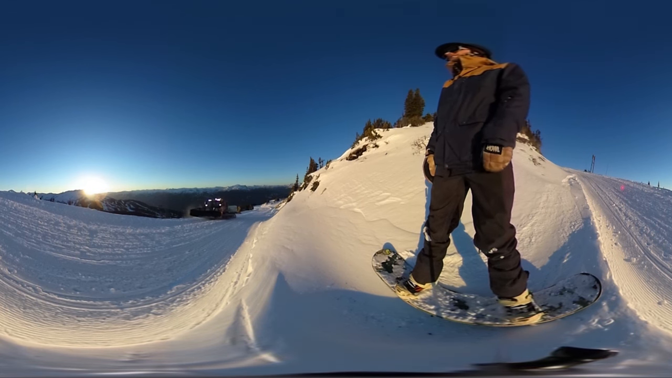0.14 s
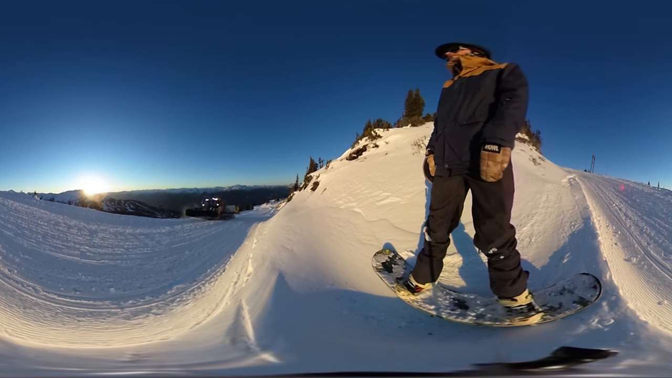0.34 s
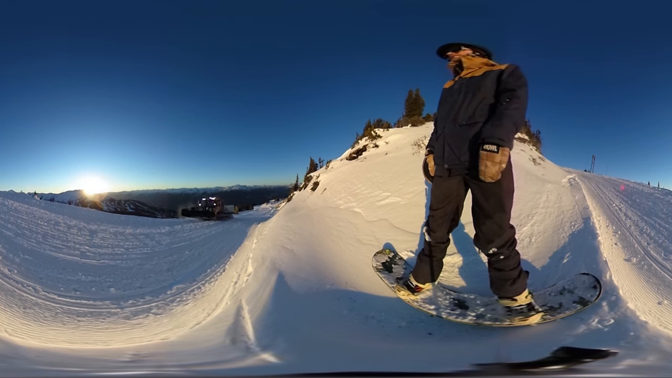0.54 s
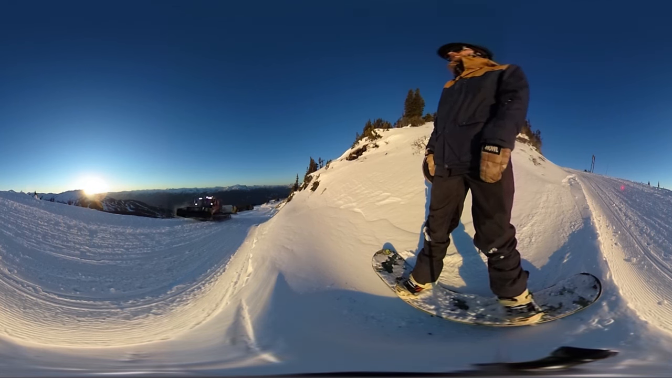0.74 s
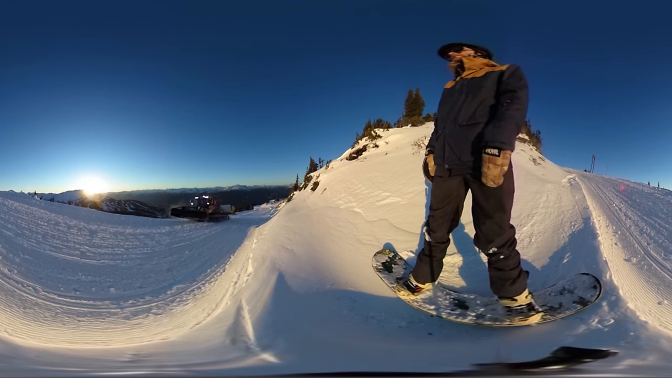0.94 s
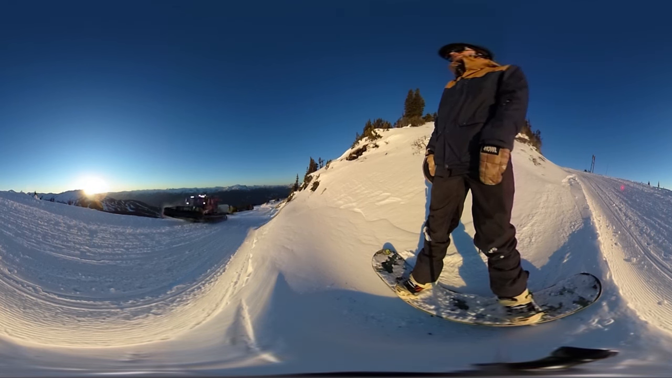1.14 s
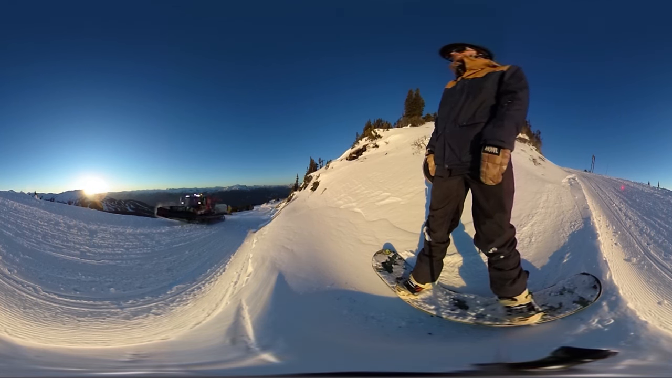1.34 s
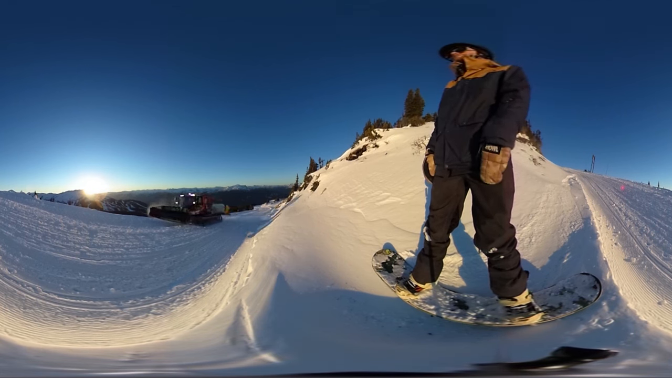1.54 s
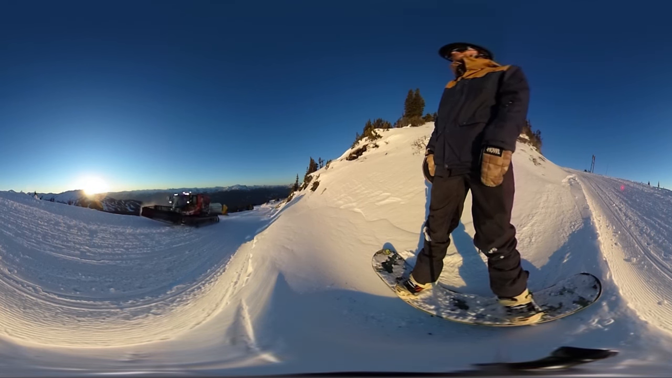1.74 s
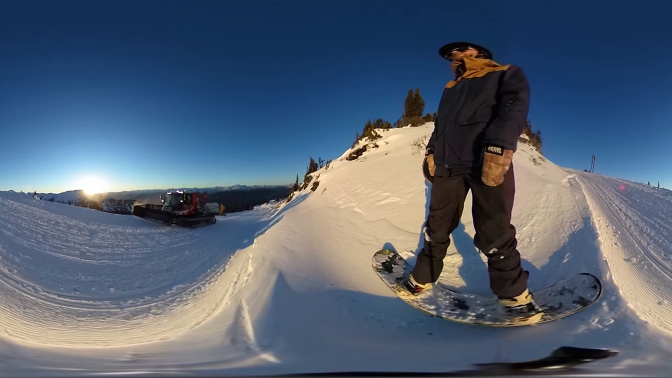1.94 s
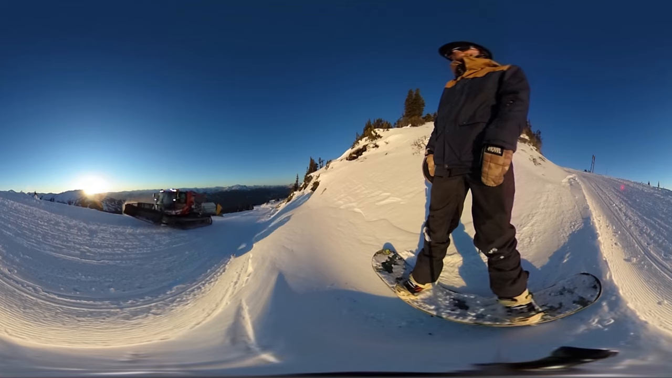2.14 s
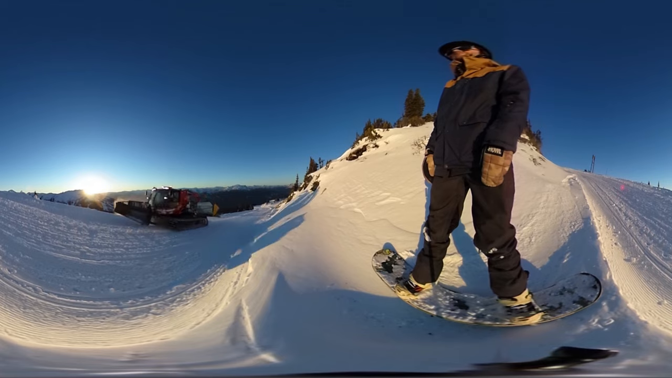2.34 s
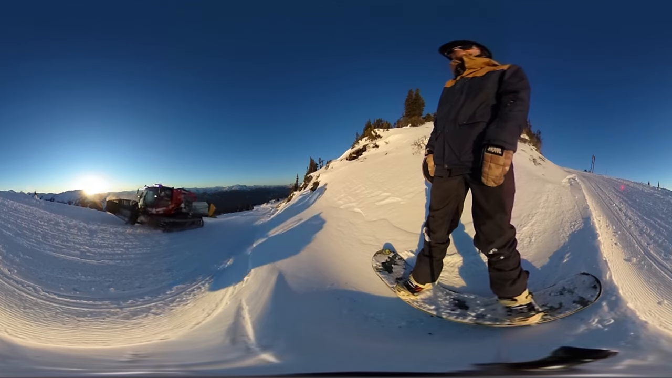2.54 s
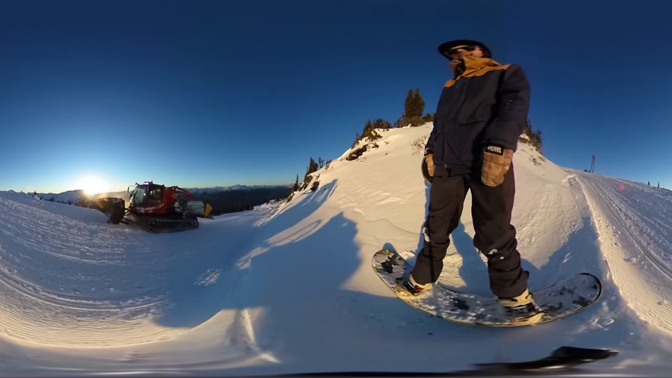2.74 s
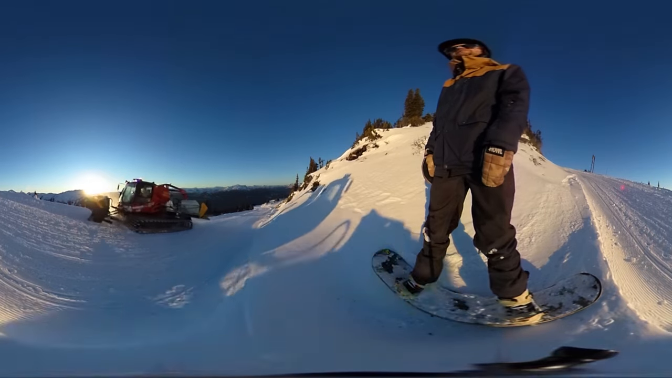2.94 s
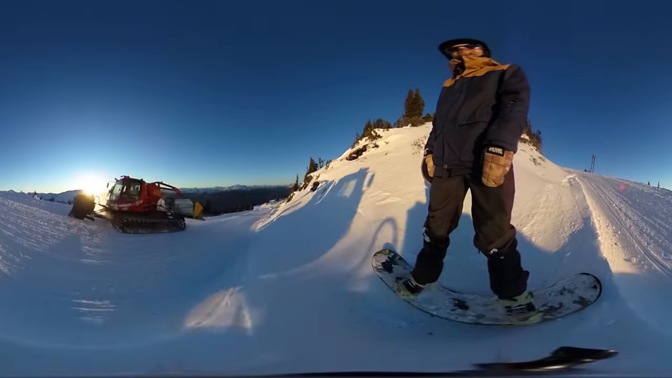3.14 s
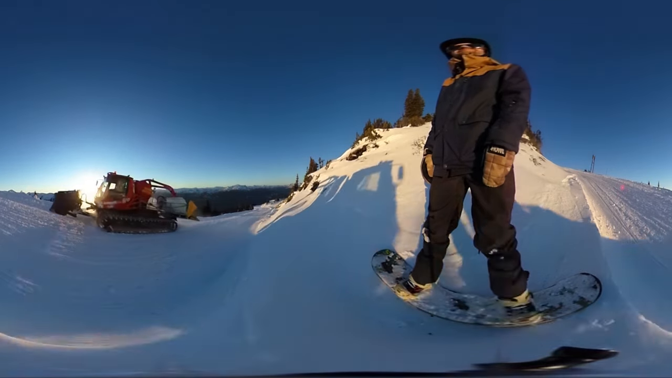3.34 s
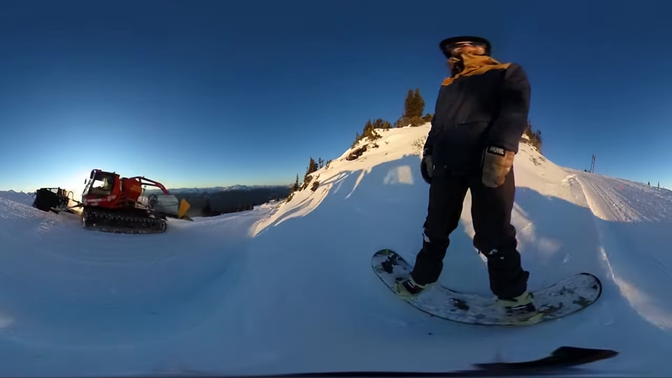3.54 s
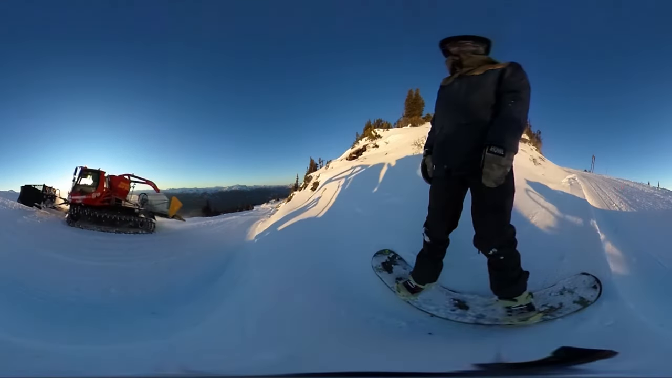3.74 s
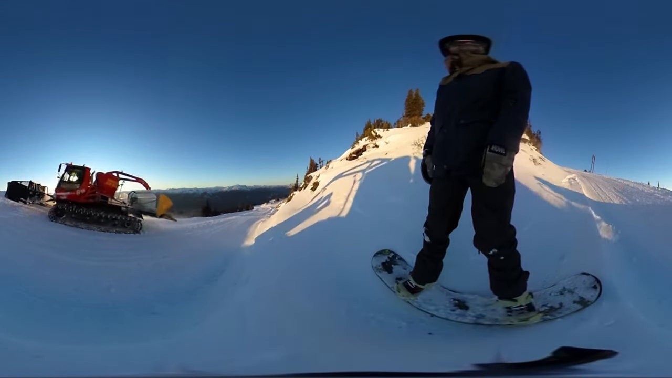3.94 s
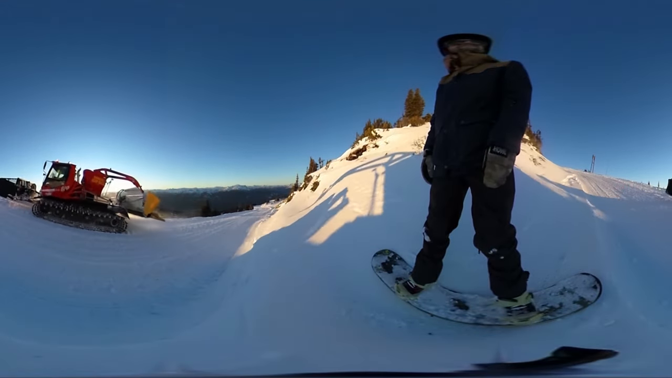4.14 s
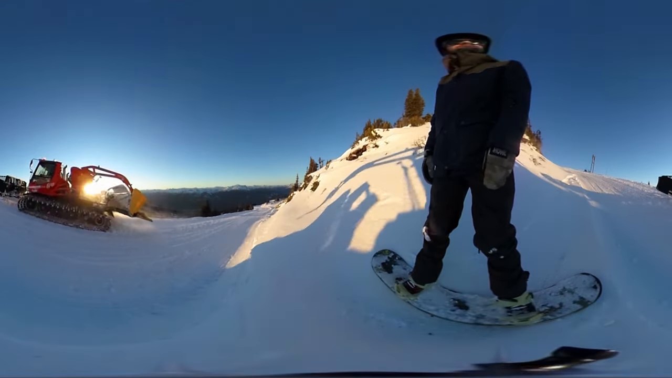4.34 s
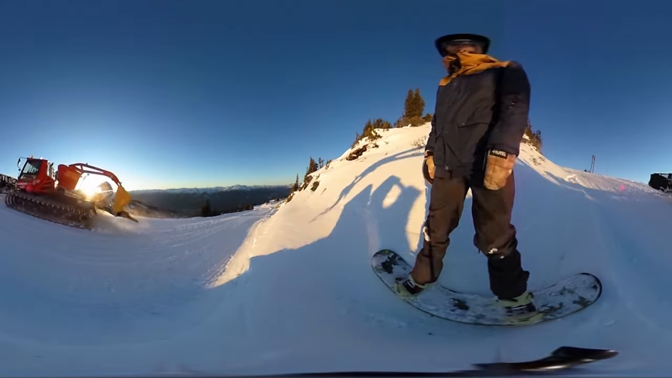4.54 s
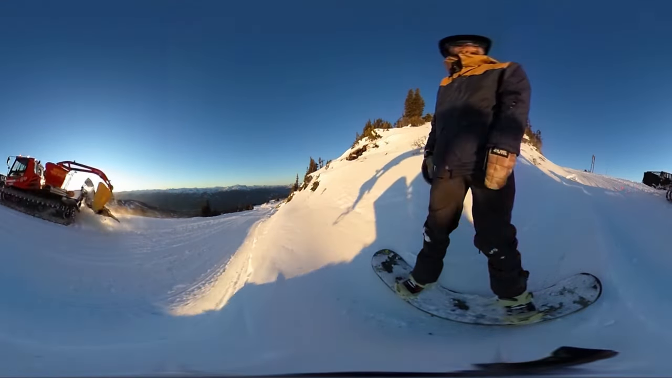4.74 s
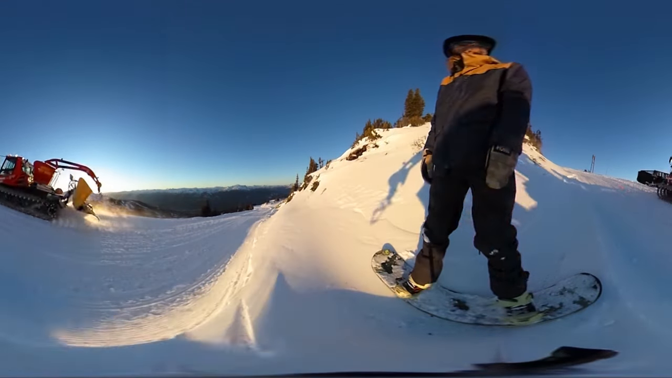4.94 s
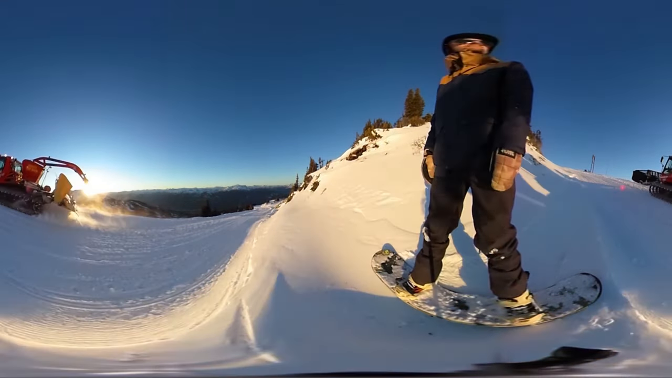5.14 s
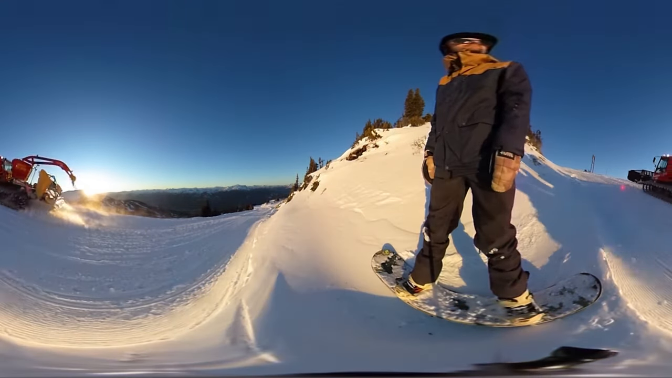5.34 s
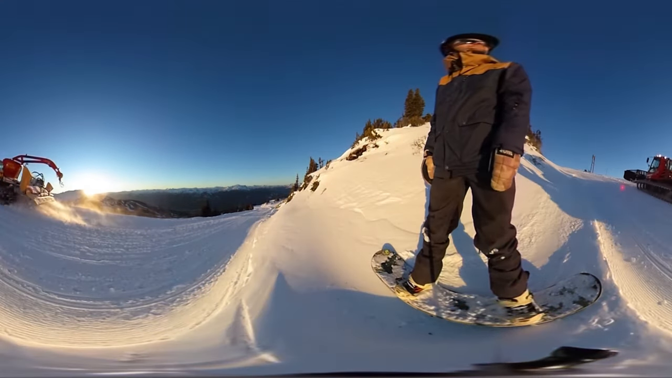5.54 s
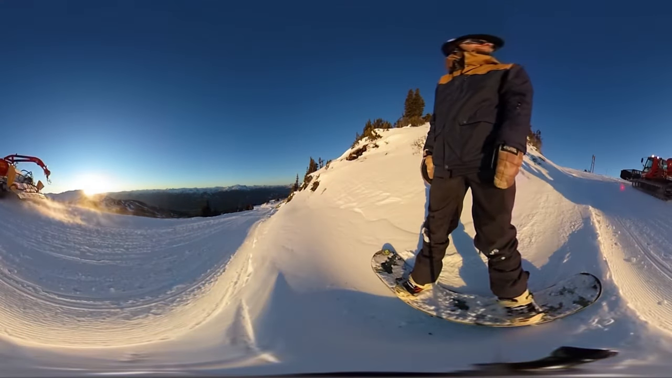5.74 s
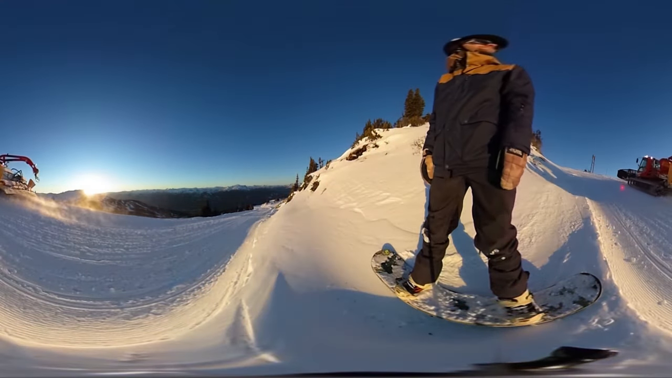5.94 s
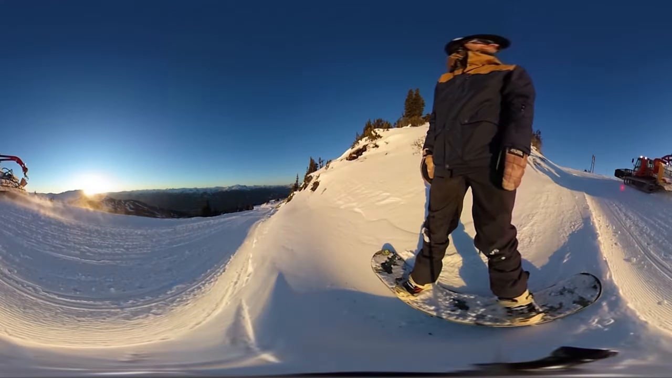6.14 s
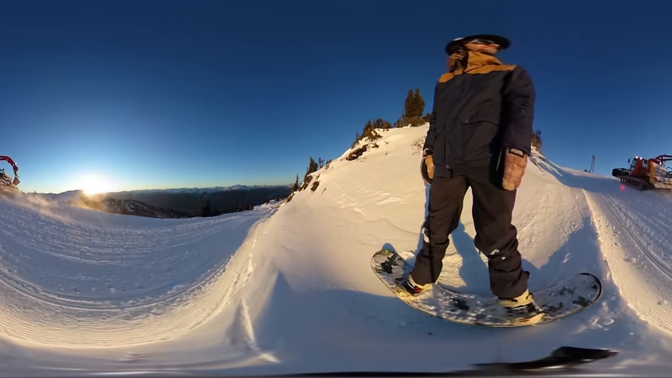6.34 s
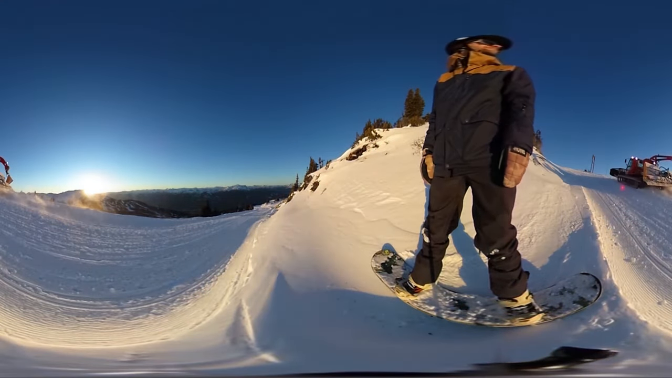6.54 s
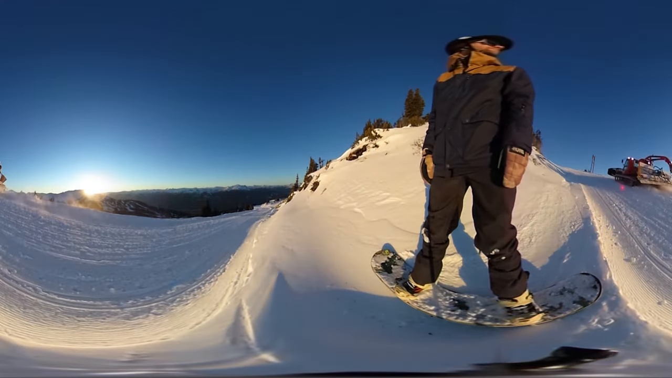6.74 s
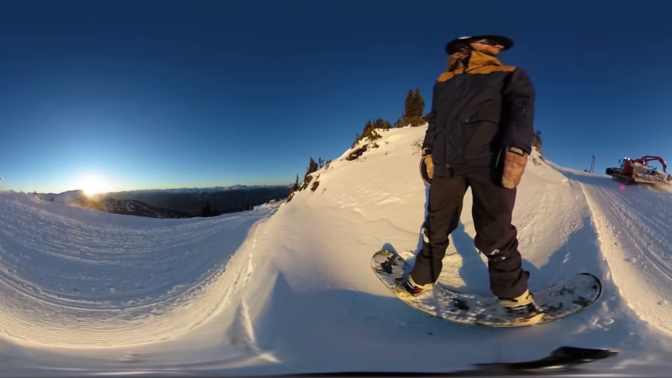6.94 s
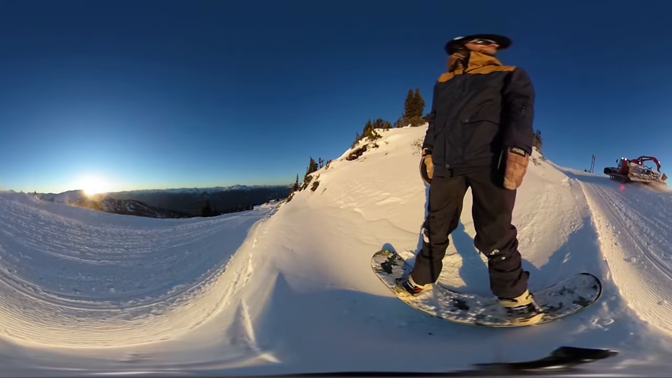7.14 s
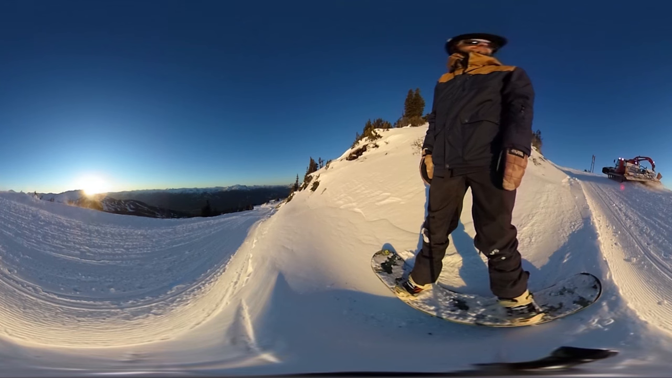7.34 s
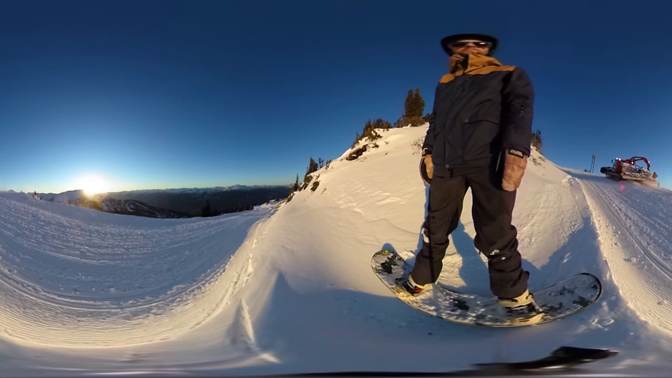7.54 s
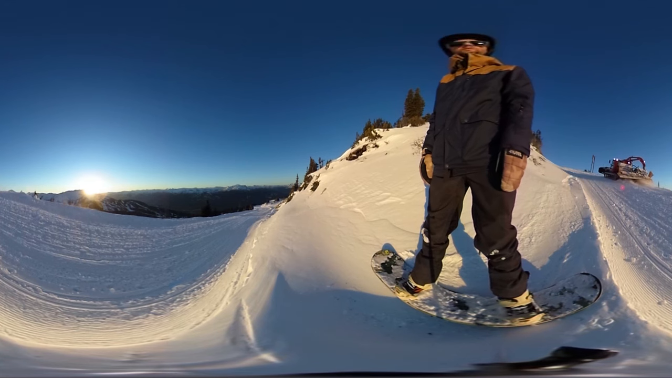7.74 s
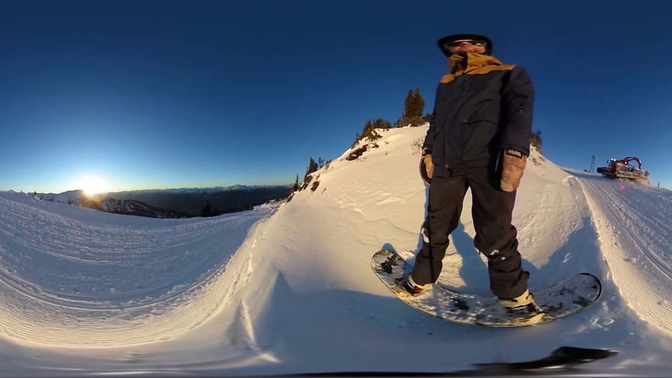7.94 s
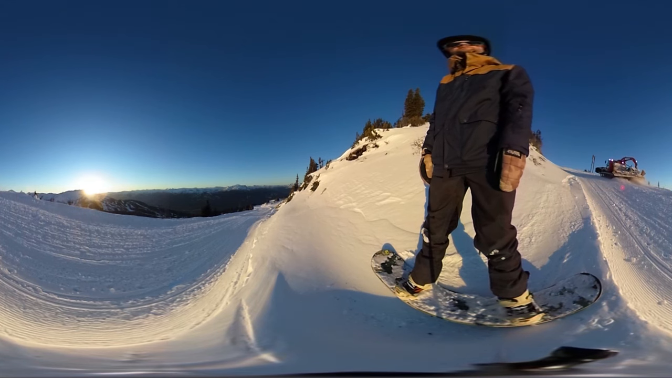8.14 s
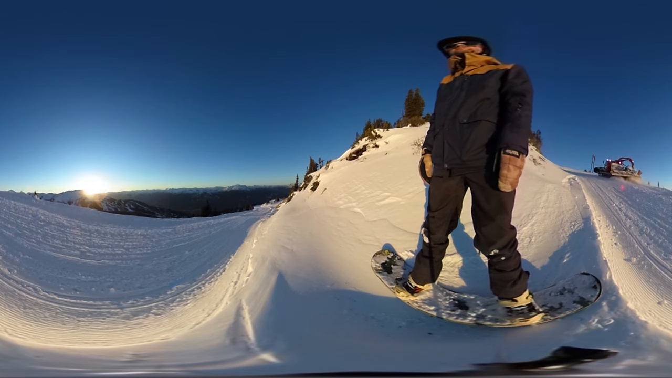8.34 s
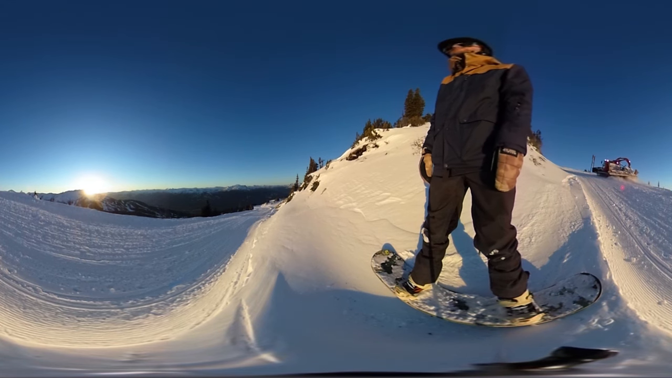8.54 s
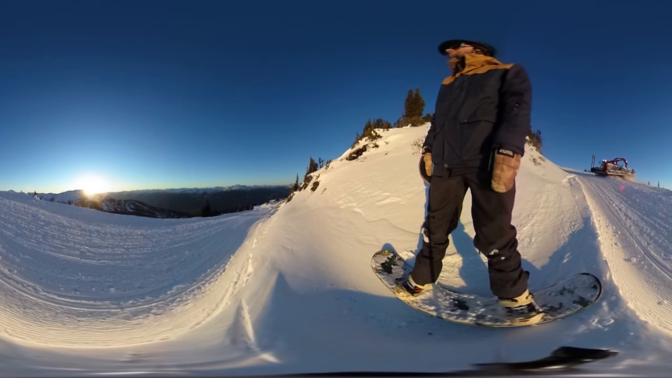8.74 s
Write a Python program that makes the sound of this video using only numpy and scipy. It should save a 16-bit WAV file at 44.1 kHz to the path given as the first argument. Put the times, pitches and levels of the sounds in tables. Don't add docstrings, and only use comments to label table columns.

```python
import sys
import numpy as np
from scipy import signal
from scipy.fft import rfft, irfft, next_fast_len
from scipy.io import wavfile
from scipy.ndimage import uniform_filter1d

SR = 44100
rng = np.random.default_rng(int(sys.argv[2]) if len(sys.argv) > 2 else 0)


def generate_wav(sig):
    pcm = np.round(np.clip(np.atleast_2d(sig).T, -1, 1) * 32767).astype(np.int16)
    wavfile.write(sys.argv[1], SR, pcm)


def rack_gain(trim_db):
    fader = np.asarray(trim_db, float)
    return 10 ** (fader / 20)


N = 391608


def rms_one(x):
    return x / np.sqrt(np.mean(x ** 2) + 1e-20)


def in_time(rows):
    time_s, *columns = np.transpose(rows)
    return [np.interp(np.arange(N) / SR, time_s, column) for column in columns]


def by_bearing(rows, bearing_deg):
    deg, *columns = np.transpose(rows)
    return [np.interp(bearing_deg, deg, column) for column in columns]


def drift(rate_hz):
    knots = rng.standard_normal(int(N / SR * 40) + 200)
    r = np.exp(-2 * np.pi * rate_hz / 40)
    slow = rms_one(signal.lfilter([1], [1, -2 * r, r * r], knots)[190:])
    return np.interp(np.arange(N) * 40 / SR, np.arange(len(slow)), slow)


def coloured(hz, db, band_hz):
    size = next_fast_len(N)
    bins_hz = np.maximum(np.arange(size // 2 + 1) * SR / size, 1)
    shape = rack_gain(np.interp(np.log(bins_hz), np.log(hz), db, -70, -70))
    spectrum = rfft(rng.standard_normal(size)) * shape
    inside = irfft(spectrum * (bins_hz > band_hz[0]) * (bins_hz < band_hz[1]), size)
    return irfft(spectrum, size)[:N] / inside.std()


def ring(clicks, hz, t60_s):
    r = rack_gain(-60 / (t60_s * SR))
    w = 2 * np.pi * hz / SR
    return signal.lfilter([0, np.sin(w)], [1, -2 * r * np.cos(w), r * r], clicks + 1e-18)


def boost(x, hz, width_hz, db):
    r = np.exp(-np.pi * width_hz / SR)
    poles = [1, -2 * r * np.cos(2 * np.pi * hz / SR), r * r]
    peak = signal.lfilter([(1 - r * r) / 2, 0, (r * r - 1) / 2], poles, x)
    return x + (rack_gain(db) - 1) * peak


def firing_phase():
    # (time [s], firing rate [Hz])
    engine_speed = [(0, 86.0), (.6, 87.3), (1.1, 88.3), (1.4, 88.0), (2.1, 88.8), (2.4, 87.0), (2.7, 86.6),
                    (3.4, 86.6), (4.15, 87.3), (4.55, 85.2), (5.35, 85.8), (5.65, 86.8), (6.6, 86.3),
                    (7.15, 86.0), (7.45, 85.1), (8.0, 84.9), (8.35, 86.6), (8.88, 85.6)]
    firing_hz, = in_time(engine_speed)
    return 2 * np.pi * np.cumsum(firing_hz) / SR


def exhaust(turn, near_db, bearing_deg):
    # (bearing from nose [deg], firing [dB], uneven cylinder [dB],
    # second [dB], third [dB], pump whine [dB])
    tone_beam = [(20.3, 0, -43, -35, -33, -26), (23.3, 0, -18, -19.5, -42, -19),
                 (28.6, 0, -24, -24, -43, -23), (35, 0.67, -17, -21.5, -27, -14),
                 (38.3, 0.36, -20, -20.5, -14, -12), (44, 1.4, -11, -15, -13.5, -20.5),
                 (65, 0, -32, -17.5, -9, -15), (86, 0, -29, -20.5, -11.5, -24),
                 (116.5, 0, -37, -18, -7, -20.5), (126, 0, -36, -19.5, -12.5, -14.5),
                 (140, 0.19, -31, -15.5, -15.5, -29), (149, 1.4, -33, -13.5, -21.5, -21.5),
                 (156, 0.29, -28, -12.5, -19.5, -24)]
    levels_db = [near_db + db for db in by_bearing(tone_beam, bearing_deg)]
    firing_db, uneven_db, second_db, third_db, pump_db = levels_db
    # (multiple of firing rate, level [dB], phase lead [rad])
    lines = [(1, firing_db, 0), (5 / 6, uneven_db, 0), (10 / 6, uneven_db - 4, 0),
             (2, second_db, 0), (3, third_db, 0.8), (4.265, pump_db, 0)]
    return sum(np.sqrt(2) * rack_gain(db) * np.cos(k * turn + lead) for k, db, lead in lines)


def roar(facing):
    # (frequency [Hz], front [dB], side [dB], rear [dB])
    roar_colour = [(240.7, 2, 13.5, -0.5), (587, -1, 2.5, -2.5), (907, -1, 1, 0), (1530, -14, -7, -8.5),
                   (3120, -18.5, -15, -13), (3600, -15, -13, -23), (5000, -21, -14.5, -29),
                   (7460, -34, -30.5, -57)]
    hz, *colours_db = np.transpose(roar_colour)
    drones_db = (11.6, 1.3, 7.1)
    out = np.zeros(N)
    for side, (colour_db, drone_db) in enumerate(zip(colours_db, drones_db)):
        share = np.clip(1 - abs(facing - side), 0, 1)
        sway = rack_gain(0.82 * drift(7.4))
        noise = boost(coloured(hz, colour_db, (400, 3000)), 463, 40, drone_db)
        out += np.sqrt(share) * sway * noise
    return out


def clatter():
    # (frequency [Hz], level [dB], t60 [s])
    track_modes = [(1900, -4.5, 0.12), (2127, -2, 0.07), (2540, 10, 0.007), (2980, -1, 0.043),
                   (3290, -19, 0.016), (5020, -19, 0.018)]
    sizes = rack_gain(1.9 * np.minimum(rng.exponential(1, N), 4)) * rng.choice([-1, 1], N)
    born = rng.random(N) < 260 / SR
    dealt = rng.integers(0, len(track_modes), N)
    out = np.zeros(N)
    for k, (hz, db, t60_s) in enumerate(track_modes):
        out += rack_gain(db) * ring(sizes * born * (dealt == k), hz, t60_s)
    return rms_one(out)


def snow_echo(x, lag_ms, turn_rad):
    centre_hz, spread_octaves = 1180, 0.83
    late = np.interp(np.arange(N) - lag_ms * SR / 1000, np.arange(N), x)
    size = next_fast_len(N)
    octaves = np.log2(np.maximum(np.arange(size // 2 + 1) * SR / size, 1) / centre_hz)
    response = np.exp(-0.5 * (octaves / spread_octaves) ** 2 - 1j * turn_rad)
    return irfft(rfft(late, size) * response, size)[:N]


def over_snow(x):
    # (time [s], high lag [ms], high share [1], low lag [ms], low share [1])
    echo_path = [(0, 2.36, 0.23, 2.2, 0.23), (1, 2.25, 0.46, 2.36, 0.089), (3, 2.6, .25, 3.4, 0.063),
                 (4.1, 3, 0.16, 2.33, 0.032), (5.2, 2.86, 0.17, 1.91, 0.29), (6, 2.06, 0.35, 1.43, 0.7),
                 (6.5, 1.93, 0.57, 1.37, 0.2), (7.5, 1.49, 0.65, 0.86, 0.092),
                 (8.88, 1.21, 0.6, 0.96, 0.066)]
    high_ms, high, low_ms, low = in_time(echo_path)
    echoes = high * snow_echo(x, high_ms, 1.25) + low * snow_echo(x, low_ms, -1.17)
    return (x + echoes) / np.sqrt(1 + 0.5 * (high ** 2 + low ** 2))


def rumble():
    # (frequency [Hz], level [dB])
    rumble_colour = [(24, -8), (42, 2), (60, 4.5), (110, 3.5), (150, 1.5), (200, -4), (260, -10.5),
                     (400, -33)]
    sway_db = 1.5 * drift(4.6)
    return rack_gain(-16.5 + sway_db) * coloured(*np.transpose(rumble_colour), (100, 160))


def powder(facing):
    # (frequency [Hz], level [dB])
    hiss_colour = [(3500, -55), (5500, -7.5), (7000, -8), (8800, -9), (10500, -2), (12000, 1), (16000, -5)]
    hiss = coloured(*np.transpose(hiss_colour), (6000, 12000))
    trail = boost(hiss, 8600, 2300, 3.5) * rack_gain(-1.5)
    behind = np.clip((facing - 1.7) / 0.25, 0, 1)
    return (1 - behind) * hiss + behind * trail


def clanks():
    # (time [s], level [dB, the click starts 15 lower], frequency [Hz])
    loud_bars = [(2.44, -23, 2660), (3.3994, -22, 2870), (3.4424, -27, 3320), (3.4747, -18, 3200),
                 (3.5153, -22, 3300), (3.5444, -6, 2980), (3.5698, -14, 3230), (3.6037, -23, 2920),
                 (3.639, -20, 3320), (3.662, -33, 2620), (3.7203, -14, 2700), (3.7976, -25, 2950),
                 (4.6839, -21, 2565), (5.4251, -8, 2530), (6.181, -10, 2630)]
    out = np.zeros(N)
    for time_s, db, hz in loud_bars:
        click = np.zeros(SR // 5)
        click[0] = rack_gain(db - 15)
        at = round(time_s * SR)
        out[at:at + len(click)] += ring(click, hz, 0.091) + 0.39 * ring(click, 0.91 * hz, 0.056)
    return out


def scrape():
    # (time [s], upper modes [dB], lower mode [dB])
    drag = [
        (3.3, -70, -70),
        (3.42, -39, -56),
        (3.55, -31, -61),
        (3.66, -44, -37),
        (3.85, -31, -39),
        (4.0, -66, -64),
    ]
    upper_db, lower_db = in_time(drag)
    grit = rng.standard_normal((3, N)) * rack_gain(2.9 * drift(15))
    upper = rms_one(ring(grit[0], 2980, 0.071) + ring(grit[1], 3250, 0.056))
    lower = rms_one(ring(grit[2], 2720, 0.05))
    return rack_gain(upper_db) * upper + rack_gain(lower_db) * lower


def sprays(t):
    # (time [s], hiss rise [dB], roar rise [dB])
    throws = [(3.55, -0.5, -0.5), (4.38, 2.5, 1.5), (4.82, 2.5, 1), (5.75, 5, 0.5), (5.97, 5, 0),
              (6.23, 3.5, 0), (6.52, 3, 0), (7.0, 1, 0), (7.3, 1.5, 2), (7.48, 4, 0.5), (7.6, 0.5, 1.5),
              (8.05, 4.5, 2.5), (8.37, 3, 0.5), (8.81, 2, 0)]
    half_width_s = 0.075
    hiss_rise_db, roar_rise_db = np.zeros(N), np.zeros(N)
    for time_s, hiss_db, roar_db in throws:
        bell = np.exp(-0.5 * ((t - time_s) / half_width_s) ** 2)
        hiss_rise_db += bell * hiss_db
        roar_rise_db += bell * roar_db
    return hiss_rise_db, roar_rise_db


def scene():
    # (bearing from nose [deg], roar [dB], snow hiss [dB],
    # facing [0 front, 1 side, 2 rear], firing pulse depth [0-1])
    noise_beam = [(20, -14, -35, 0.037, 0.18), (30.2, -12.5, -32, 0.064, 0),
                  (35.3, -13.5, -33, 0.036, 0.07), (49.5, -10.5, -28.5, 0.72, 0.04),
                  (67.7, -9, -22.5, 0.96, 0.18), (91, -8.5, -21.5, 1.06, 0.12), (110.5, -7, -19, 1.64, 0.1),
                  (126.5, -7, -22, 1.89, .18), (144.2, -8.5, -22.5, 1.99, 0.3),
                  (139.4, -11.5, -23.5, 2.53, 0.12), (167.3, -7, -23.5, 1.83, 0.32)]
    abreast_s, pass_s, abreast_db = 4.6, 1.7, -9.1
    t = np.arange(N) / SR
    along = (t - abreast_s) / pass_s
    near_db = abreast_db - 10 * np.log10(1 + along ** 2)
    bearing_deg = 90 + np.degrees(np.arctan(along))
    roar_db, hiss_db, facing, depth = by_bearing(noise_beam, bearing_deg)
    hiss_rise_db, roar_rise_db = sprays(t)

    turn = firing_phase()
    tones = exhaust(turn, near_db, bearing_deg)
    puff = 1 + depth * np.cos(turn - 1.6)
    noise = puff * roar(np.clip(facing, 0, 2)) + rack_gain(-18) * clatter()
    noise = rack_gain(near_db + roar_db + roar_rise_db - 3.5) * noise
    body = over_snow(noise + clanks() + scrape())
    low = rack_gain(near_db) * rumble()
    hiss_level_db = near_db + hiss_db + hiss_rise_db - 3 + 0.92 * drift(12)
    hiss = rack_gain(hiss_level_db) * puff * powder(facing)
    return (tones + body + low + hiss)[None]


def housing(x):
    # (frequency [Hz], width [Hz], level [dB])
    housing_modes = [(741, 47.6, 9), (968, 20, 6), (2104, 173, 8.5), (2648, 57, 5), (3300, 77, 3),
                     (3770, 150, -3), (7640, 770, 8)]
    for hz, width_hz, db in housing_modes:
        x = boost(x, hz, width_hz, db)
    return x


def overload(x, top, knee):
    return x / (1 + (abs(x) / top) ** knee) ** (1 / knee)


def thin_spectrum(x, mask_db, from_hz):
    cut_hz, leak_top_hz, leak_db, leak_share = 12020, 15200, -25, 0.23
    hz, _, cells = signal.stft(x, SR, nperseg=2048)
    level = np.log(abs(cells) ** 2 + 1e-20)
    mask = uniform_filter1d(uniform_filter1d(level, size=160, axis=1), size=3, axis=2)
    near = uniform_filter1d(uniform_filter1d(np.exp(level), size=3, axis=1), size=2, axis=2)
    kept = (np.log(near) > mask + np.log(rack_gain(mask_db) ** 2)) | (hz < from_hz)[:, None]

    loud = np.log(np.exp(level).sum(axis=1, keepdims=True))
    loud = loud + 0.2 * rng.standard_normal(level.shape[2])
    leaking = loud > np.quantile(loud, 1 - leak_share)
    top = (hz >= cut_hz) & (hz < leak_top_hz)
    passed = (hz < cut_hz)[:, None] + rack_gain(leak_db) * top[:, None] * leaking
    return signal.istft(cells * kept * passed, SR, nperseg=2048)[1]


def roll_off(x):
    return signal.sosfilt(signal.butter(12, 15800, fs=SR, output="sos"), x)


def record(dry):
    run_in = 4096
    x = np.pad(dry, ((0, 0), (run_in, run_in)), "reflect", reflect_type="odd")
    x = overload(housing(x), top=0.69, knee=6)
    x = thin_spectrum(x, mask_db=-2.8, from_hz=2300)[:, run_in:run_in + N]
    mix = overload(x, top=0.65, knee=60)
    return roll_off(mix)


dry = scene()
out = record(dry)
generate_wav(out)
```